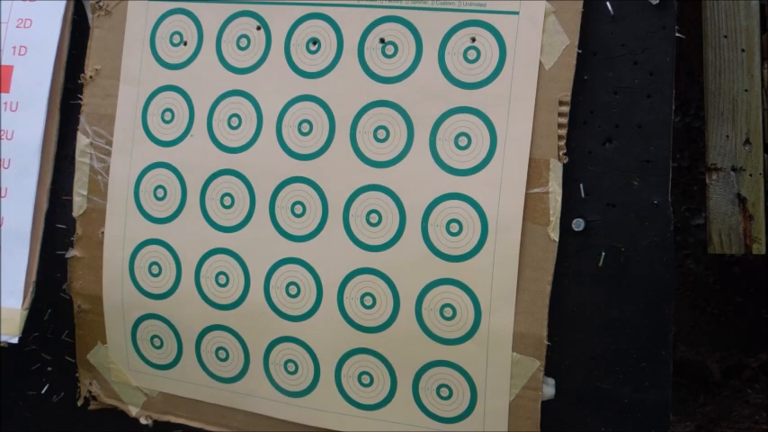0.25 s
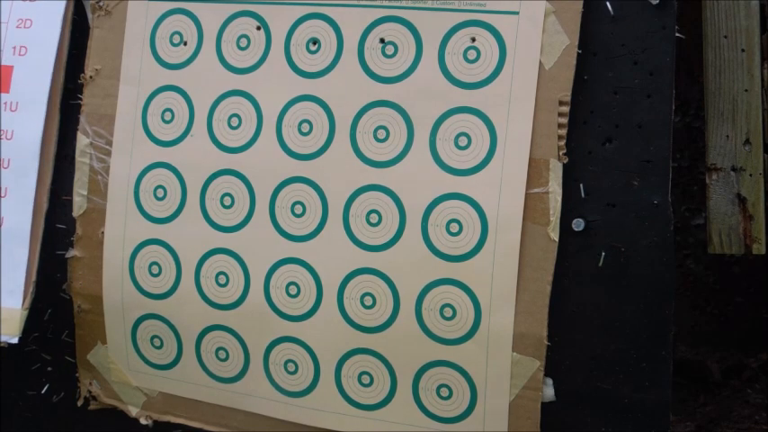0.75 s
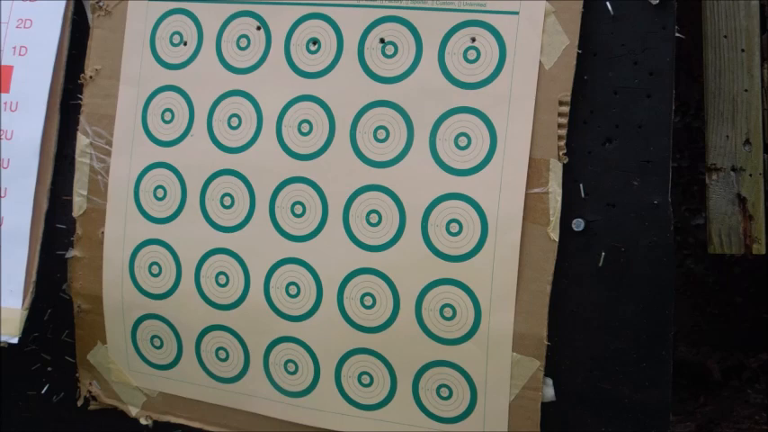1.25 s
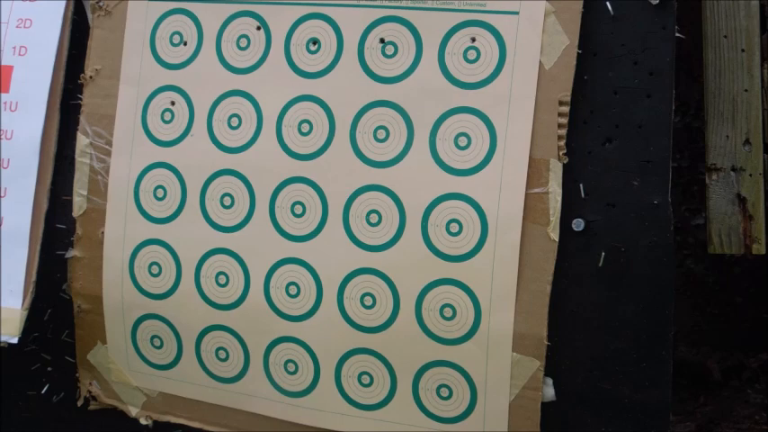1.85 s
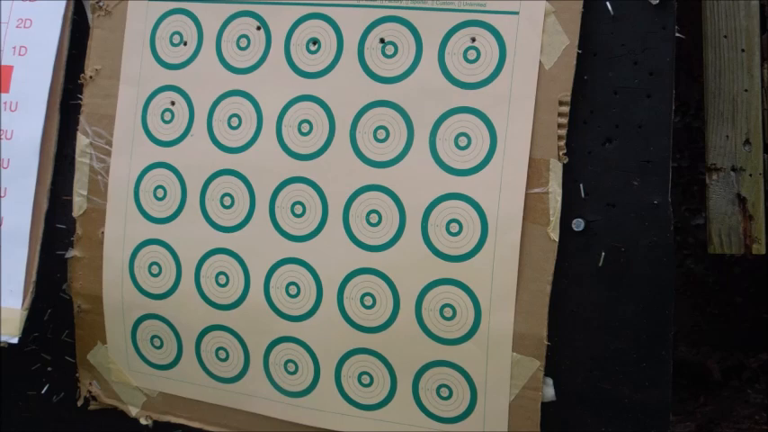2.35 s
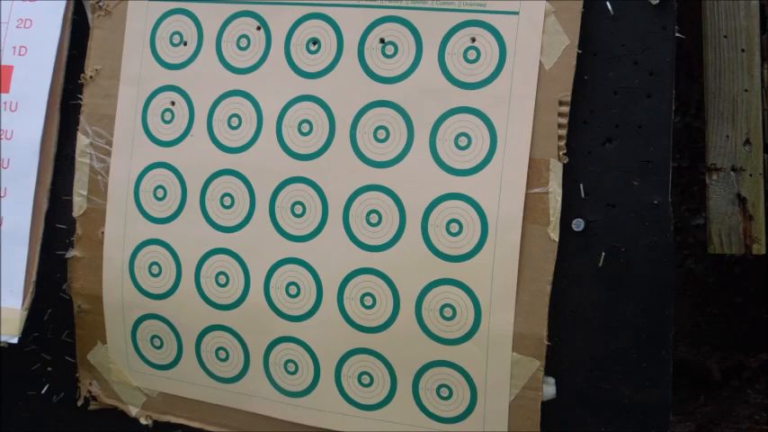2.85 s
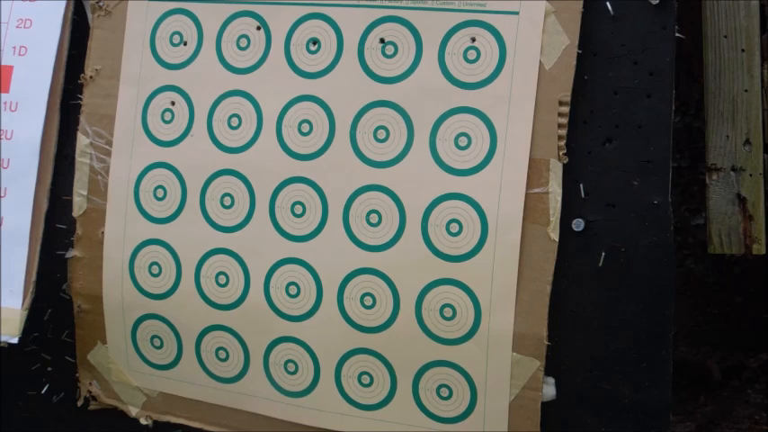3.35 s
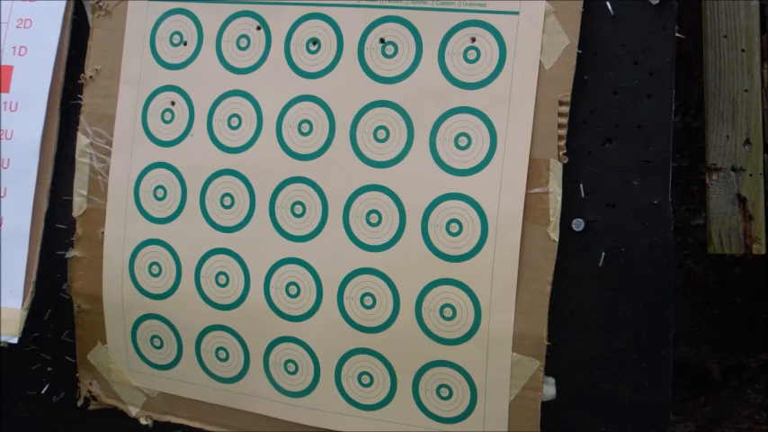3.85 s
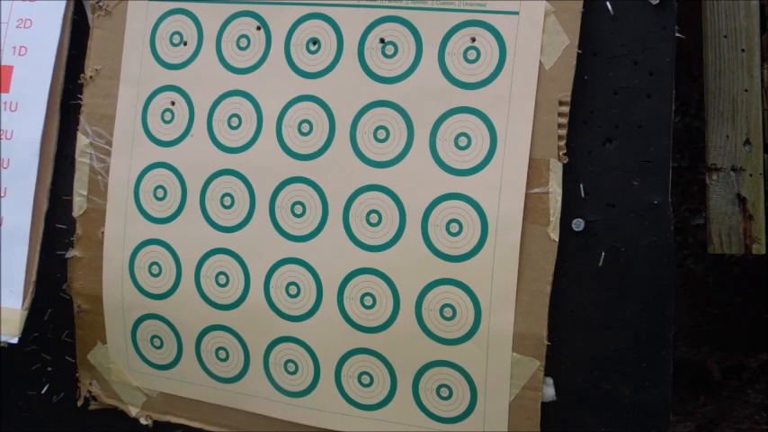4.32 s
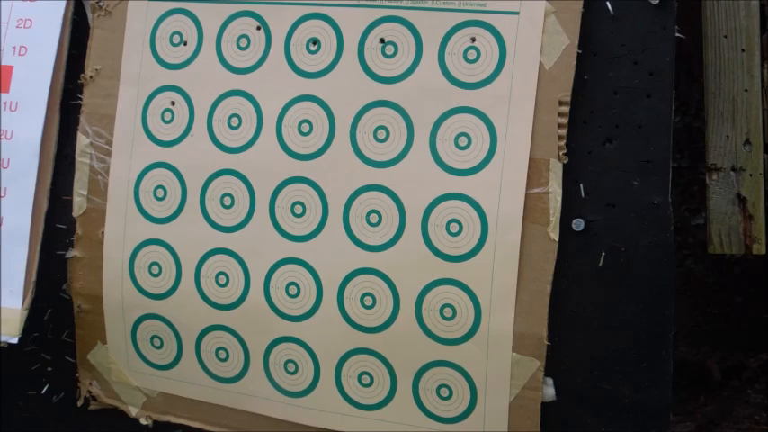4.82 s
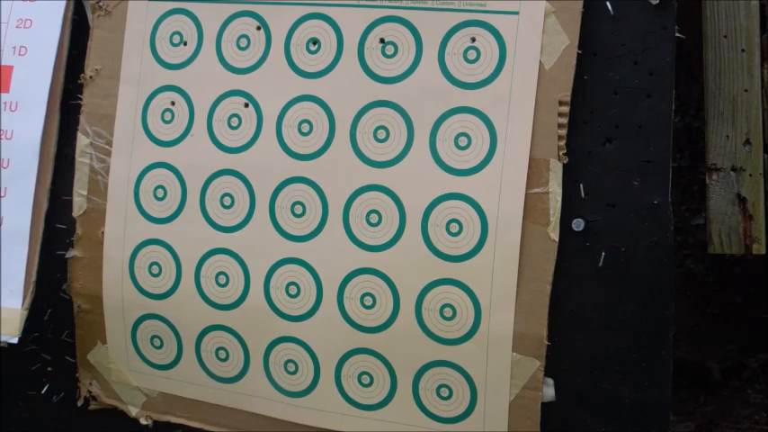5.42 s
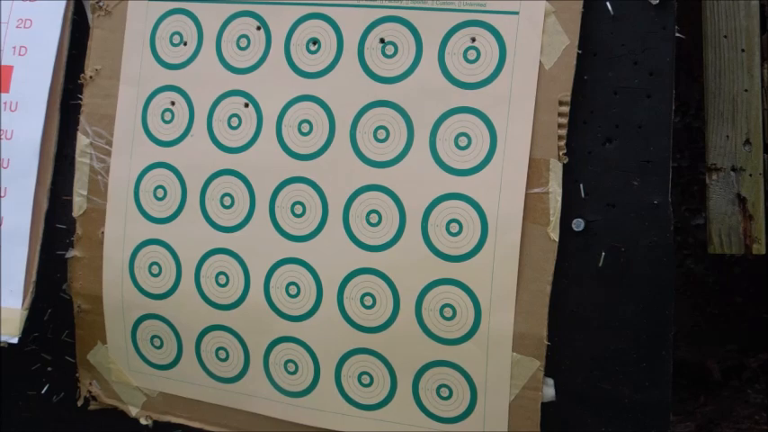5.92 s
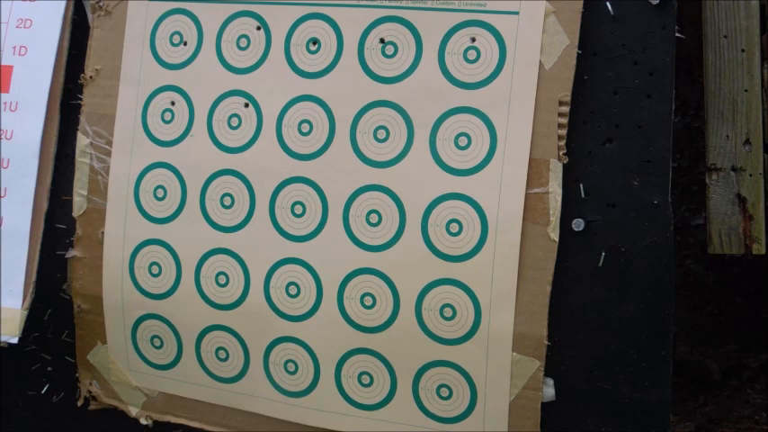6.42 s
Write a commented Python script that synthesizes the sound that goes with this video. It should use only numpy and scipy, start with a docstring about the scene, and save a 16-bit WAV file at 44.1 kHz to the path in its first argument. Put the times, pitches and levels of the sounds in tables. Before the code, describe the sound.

Two bullets crack and slap into a paper target at close range, each followed by a distant report echoing through woods full of trilling insects.

```python
"""Two small-calibre rifle shots, heard from beside the paper target in a wood full of trilling insects.
Each bullet's crack and strike, shaped noise bursts, overload the microphone; the distant report follows as
single pressure cycles and as noise decaying faster in the treble, the echo of the trees. Insects are gliding
and pulsing tones over band noise; ticks, draught and gusts are coloured noise; eddies are brief low tones.
The sound cuts out four times and swells back; as the second gap ends the right channel crackles."""
import sys
import numpy as np
from scipy import signal
from scipy.fft import rfft, irfft, next_fast_len
from scipy.io import wavfile
from scipy.ndimage import map_coordinates

SR = 44100
rng = np.random.default_rng(int(sys.argv[2]) if len(sys.argv) > 2 else 0)


def master(y):
    """Save y as 16-bit WAV."""
    cut = np.clip(np.atleast_2d(y).T, -1, 1)
    pcm = np.round(cut * 32767)  # scale
    wavfile.write(sys.argv[1], SR, pcm.astype(np.int16))


N = 294579
TIME = np.arange(N) / SR  # s

# All levels below are relative, ahead of the mix and the clipping input. Level of the insects over time. Each
# row: time in seconds, nearest insect in dB, chorus in dB.
INSECT_LEVEL = [(0, -40, -44.5), (.7, -41.5, -44), (1.4, -38, -42.5), (1.9, -47, -49.5), (2.1, -43.5, -50),
                (2.4, -37, -42), (2.7, -30, -41), (3.8, -32.5, -44), (4.3, -34.5, -44), (5.0, -33, -41.5),
                (5.4, -43, -59), (5.9, -31.5, -44), (6.68, -34, -43)]
# Singers that stand out of the chorus. Each row: pitch in Hz, pulses per second, level in dB.
FAR_SINGERS = [(8240, 29.2, -5.5), (7760, 19.2, -5.5)]
# Nearly even pace of the nearest insect. Each row: from this time in seconds, chirps per second.
CHIRP_PACE = [(0, 13.658), (2.35, 13.17), (3.4, 13.921), (4.6, 12.982), (4.85, 13.683), (6.1, 13.565)]
FIRST_CHIRP_S, CHIRP_JITTER_S = .756, .001
# Slow draught under the gusts. Each row: time in seconds, level of the deep bass in dB.
DRAUGHT_LEVEL = [(0, -35), (.45, -34.5), (.9, -52), (2.35, -49), (2.6, -35), (3.5, -36), (3.85, -43),
                 (4.9, -38), (5.75, -43), (6.5, -39)]
# Gusts that buffet the microphone. Each row: start in seconds, hold in seconds, level in dB before it sags.
WIND_GUSTS = [(0, .22, -40), (.37, .14, -44.5), (2.6, .28, -26), (2.99, .22, -32.5), (3.31, .14, -32.5),
              (3.53, .12, -40.5), (4.43, .1, -35), (4.69, .18, -29), (5.42, .18, -43), (6.04, .05, -40),
              (6.38, .18, -39.5)]
GUST_RISE_S, GUST_SAG_DB_PER_S, GUST_T60_S = .025, 12, .27
CALM_DB = -57  # rumble between gusts
# Small dry ticks in the litter. Each row: start in seconds, level in dB, 60 dB decay time in seconds.
LITTER_TICKS = [(0.096, -43, 0.036), (0.156, -50, .03), (0.373, -43.5, .025), (0.449, -30.5, .05),
                (6.32, -40, .04)]
# Soft bumps of the air. Each row: centre in seconds, level in dB, frequency in Hz, width in seconds.
AIR_BUMPS = [(.212, -45, 162, .014), (2.63, -24.5, 200, 0.008), (2.81, -31.5, 135, 0.023),
             (2.866, -25.5, 125, 0.016), (3.181, -33.5, 163, 0.017), (3.45, -24, 89.5, 0.016),
             (4.528, -31.5, 191, 0.0067), (4.709, -29, 160, 0.004), (6.086, -30, 200, 0.0075),
             (6.452, -34, 218, 0.01)]
# Silences. Each row: start in seconds, end in seconds, recovery time constant in seconds.
SILENCES = [(0.69, 0.748, 0.37), (2.426, 2.477, 0.42), (3.897, 3.941, 0.58), (6.568, 6.626, 0.66)]
# Bullets arriving. Each row: time in seconds, crack in dB, strike in dB, backboard thud in dB,
# delay of the overload swing in seconds, forest echo in dB.
BULLETS = [(1.4601, 7, 7.5, -5.5, .0205, -27), (5.078, 1.5, 4, -10.5, .0185, -27.5)]
# Dense stands of trees that swell the echo. Each row: seconds after the report, change in dB, width in seconds.
TREE_STANDS = [(0.09, 3.5, 0.0083), (.17, -2, 0.043), (.275, 1.5, 0.024), (.39, 0, 0.066)]
# The report and its echoes off single trunks, alike for every shot.
# Each row: seconds after the bullet, level in dB, centre frequency in Hz.
REPORT_SLAPS = [(.209, -14, 6300), (.2174, -9, 9000), (.2192, -9, 9400), (.2234, -8.5, 9400),
                (.2275, -21, 7000), (.2335, -22, 6000), (.2943, -16, 2500), (.433, -27, 2300),
                (.488, -23, 2200)]
# Electrical crackle. Each row: peak in seconds, drive in dB, rise and decay constant in seconds.
CRACKLE_SPIKES = [(2.4826, -0.5, 0.00084), (2.4857, 3, 0.001), (2.488, -11, 0.0016), (2.4904, 11, 0.00044),
                  (2.4949, -6.5, 0.00026)]

# Spectral shapes. Each row: frequency in Hz, relative density in dB per Hz.
CHORUS_SPECTRUM = [(4000, -74), (6100, -25.5), (6700, -7.5), (7200, -2.5), (7750, -3), (8100, -5.5),
                   (8600, -16.5), (10000, -41.5)]
HISS_SPECTRUM = [(30, 6), (200, 8), (330, 7.5), (390, 10.5), (470, 5.5), (900, 5), (2000, 1), (5500, -1.5),
                 (9000, -2.5), (11000, -5), (13000, -6.5), (14100, -2)]
DRAUGHT_SPECTRUM = [(10, -4), (25, 3), (55, 3), (80, -7.5), (160, -39)]
GUST_SPECTRUM = [(40, -27), (85, 3), (150, -1), (220, -9.5), (330, -20), (900, -53)]
CRACK_SPECTRUM = [(40, -10.5), (250, -3.5), (900, -8), (1800, -2), (3100, 2.5), (4400, -9.5), (8000, -9.5),
                  (14000, -15)]
STRIKE_SPECTRUM = [(40, -2), (200, -6), (700, 0.5), (2000, 2.5), (4500, 2.5), (7000, 2.5), (11000, 8),
                   (14000, 5)]
BOARD_SPECTRUM = [(60, -10), (160, 0.5), (260, -3), (480, -7.5), (900, -25)]
GROVE_SPECTRUM = [(100, -14.5), (600, -16.5), (1400, -3), (2900, 5), (4200, -4), (6000, -2.5), (9000, -5),
                  (12000, -2.5), (14000, -12.5)]
FOREST_SPECTRUM = [(100, -15), (550, -23), (1100, -3), (1800, 4), (3000, 6), (4000, -3), (5500, -0.5),
                   (8000, -1.5), (12000, 2.5), (14000, -13.5)]
# Reverberation of the forest. Each row: frequency in Hz, 60 dB decay time in seconds.
FOREST_DECAY = [(200, 6), (1500, 3.47), (3000, 2.07), (4200, 1.52), (6000, 1.1), (9000, 0.48), (13000, 0.4)]
# Response of the microphone. Each row: frequency in Hz, gain in dB.
MICROPHONE_RESPONSE = [(20, 0), (13500, 0), (14200, -1), (14600, -13), (16000, -17)]
# How unlike the two ports hear each kind of sound, by name.
# Each row: frequency in Hz, side level against mid in dB.
SIDE_LEVEL = {"shock": [(300, -12.5), (2500, -15), (11000, -3)], "grit": [(500, -10.5), (5000, -6.5),
              (12000, 0)], "grove": [(200, -5.5), (2000, -33), (5000, -32), (11000, -4.5)],
              "echo": [(200, -25), (2000, -14.5), (5000, -7.5), (11000, -4.5)], "around": [(200, -5.5),
              (1500, -4.5), (5000, -4), (11000, -1.5)], "wind": [(40, -1.5), (200, -2.5)]}


def amp(db):
    """Decibel law: 20 dB is a tenfold gain."""
    return 10 ** (np.asarray(db) / 20)


def unit(x):
    """Normalization: scale to rms 1."""
    return x / np.sqrt(np.mean(x ** 2) + 1e-20)


def along(points, hz):
    """Logarithmic interpolation: read (Hz, value) points on a log frequency axis."""
    f, v = np.transpose(points)
    return np.interp(np.log(hz + 1), np.log(f + 1), v)


def curves(rows):
    """Linear interpolation: one value per sample for each column after the time."""
    s, *columns = np.transpose(rows)
    return [np.interp(TIME, s, column) for column in columns]


def wobble(rate):
    """Random modulation: a smooth curve through random knots, rate knots a second."""
    knots = rng.standard_normal(int(N * rate / SR) + 4)
    return map_coordinates(knots, [TIME * rate])


def filtered(x, response):
    """Linear filtering: multiply the spectrum of x by a response of frequency."""
    n = x.shape[-1]
    m = next_fast_len(n + 8192)
    return irfft(rfft(x, m) * response(np.fft.rfftfreq(m, 1 / SR)), m)[..., :n]


def noise(spectrum, wide, size=N, spiky_db=0):
    """Partial coherence: mid and side noise of rms 1; if spiky, a crowd of clicks of very unequal size."""
    white = rng.standard_normal((2, size)) * amp(spiky_db * rng.standard_normal(size))

    def mid_side_gain(hz):
        mid_db = along(spectrum, hz)
        return amp(np.array([mid_db, mid_db + along(SIDE_LEVEL[wide], hz)]))

    mid, side = filtered(white, mid_side_gain)
    return unit(np.array([mid + side, mid - side]))


def pan(db):
    """Level difference between ears: left and right gains, positive towards the left."""
    return amp([[db / 2], [-db / 2]])


def add(track, s, sound):
    """Superposition: mix a sound into the track at time s."""
    part = track[..., round(s * SR):][..., :sound.shape[-1]]
    part += sound[..., :part.shape[-1]]


def swell(t, start, rise, hold, t60):
    """Exponential decay: an envelope that rises, holds, then falls 60 dB in each t60."""
    decay_age = np.maximum(t - start - rise - hold, 0)
    return np.clip((t - start) / rise, 0, 1) * amp(-60 * decay_age / t60)


def insects():
    """Amplitude modulation: the nearest insect chirps over pulsing neighbours and a far chorus."""
    near_db, chorus_db = curves(INSECT_LEVEL)
    far = noise(CHORUS_SPECTRUM, "around") * amp(-2 + 2.3 * wobble(40))
    port_phase = np.array([[0], [1.3]])  # rad, left and right
    for hz, rate, db in FAR_SINGERS:
        pulses = np.maximum(np.sin(2 * np.pi * rate * TIME + .6 * wobble(3)), 0) ** 2
        cycles = np.cumsum(hz + 70 * wobble(600)) / SR
        tone = np.sin(2 * np.pi * cycles + port_phase)
        far += amp(db - 2.5) * unit(pulses * tone * amp(3.6 * wobble(14)))
    near = 1.58 * amp(near_db) * chirps() * pan(-2.2)
    return near + far * amp(chorus_db) * pan(-2)


def air():
    """Turbulence: an even hiss, a deep draught, and lumpy gusts that rise fast, sag and die away."""
    hiss = amp(-46.5) * noise(HISS_SPECTRUM, "around")
    draught_db, = curves(DRAUGHT_LEVEL)
    draught = amp(draught_db) * noise(DRAUGHT_SPECTRUM, "wind") * pan(4)
    gusts = np.zeros(N)
    for s, hold, db in WIND_GUSTS:
        sagging_db = db - GUST_SAG_DB_PER_S * np.maximum(TIME - s, 0)
        gusts += amp(sagging_db) * swell(TIME, s, GUST_RISE_S, hold, GUST_T60_S)
    lumps = amp(3 * wobble(22))
    rumble = unit(lumps * noise(GUST_SPECTRUM, "wind"))
    return hiss + draught + (amp(CALM_DB) + gusts) * rumble * pan(4.9)


def ticks():
    """Impulsive excitation: faint bright ticks among dry leaves, made of very unequal clicks."""
    envelope = sum(amp(db) * swell(TIME, s, 0.0013, 0.004, t60) for s, db, t60 in LITTER_TICKS)
    spectrum = [(500, -41), (2500, -4), (8000, -10), (10500, 7.5), (14000, -15)]
    return envelope * noise(spectrum, "around", spiky_db=8.5)


def bumps():
    """Pressure of single eddies: each rocks the microphone for a few cycles, mostly on the left."""
    rocking = np.zeros(N)
    for s, db, hz, width in AIR_BUMPS:
        envelope = amp(db) * np.exp(-np.abs(TIME - s) / width)
        rocking += envelope * np.sin(2 * np.pi * hz * (TIME - s))
    return pan(7) * rocking


def presence():
    """Gain control: the level drops to nothing in each gap and then creeps back."""
    gain = np.ones(N)
    for start, end, recovery in SILENCES:
        fade = np.clip((start - TIME) / 0.01, 0, 1)
        age = np.maximum(TIME - end + 0.032, 0)  # the return starts already partly open
        back = (TIME > end) * (1 - np.exp(-(age / recovery) ** 1.5))
        gain *= np.maximum(fade, back)
    return gain


def chirp_times():
    """Quasi-periodicity: one chirp for each beat of the insect's pace, slightly early or late."""
    since, rate = np.transpose(CHIRP_PACE)
    pace = rate[np.searchsorted(since, TIME, "right") - 1]
    beats = np.cumsum(pace) / SR
    first_beat = np.interp(FIRST_CHIRP_S, TIME, beats)
    times = np.interp(np.arange(first_beat, beats[-1]), beats, TIME)
    return times + CHIRP_JITTER_S * rng.standard_normal(len(times))


def chirps():
    """Stridulation: each wing stroke sags in pitch as it slows; it reaches the two ports out of step."""
    out, t = np.zeros((2, N)), np.arange(SR // 30) / SR
    times = chirp_times()
    port_phase = np.array([[0], [1.1]])  # rad, left and right
    for s, (length, pitch, loud, slip) in zip(times, rng.standard_normal((len(times), 4))):
        stroke = np.clip(t / (.022 * amp(.5 * length)), 0, 1)  # progress from 0 to 1
        hz = 7540 + 40 * pitch + 330 * stroke - 950 * stroke ** 4
        pressure = np.abs(np.sin(np.pi * stroke)) ** .4
        # now and then the scraper skips
        grip = 1 - (slip > .9) * np.exp(-((stroke - .75) / .09) ** 2)
        tone = np.sin(2 * np.pi * np.cumsum(hz) / SR + port_phase)
        add(out, s - .0108, amp(loud * .8) * pressure * grip * tone)
    return out * amp(1.2 * wobble(500))


def overload(t, delay):
    """Overdrive recovery: the input swings to its lower rail, rebounds and settles; the left hangs longer."""
    def dip(centre, width):
        return np.exp(-((t - centre) / width) ** 2)

    rail = np.array([dip(delay + 0.0013, .0036), dip(delay - .0008, .0018)])
    u = np.maximum(t - delay, 0)
    rebound = (1 - np.exp(-(u / 0.036) ** 2)) * (np.exp(-u / 0.066) - 0.32 * np.exp(-u / 0.16))
    return -2.2 * rail + np.array([[.72], [.36]]) * rebound


def bullets():
    """Shock and impact: crack and ground bounce, then thumped board, sprayed grit and answering near trees."""
    out, t = np.zeros((2, N)), np.arange(SR) / SR
    for s, crack_db, strike_db, thud_db, delay, _ in BULLETS:
        direct = swell(t, 0, .0001, 0.0024, 0.0098)
        ground_bounce = 0.59 * swell(t, .0046, 0.00062, 0.0023, .011)
        crack = amp(crack_db) * (direct + ground_bounce) * noise(CRACK_SPECTRUM, "shock", size=SR)
        grit = noise(STRIKE_SPECTRUM, "grit", size=SR, spiky_db=3)
        spray = 1.1 * swell(t, 0.0039, 0.005, 0.0026, 0.089) + 0.5 * swell(t, .018, 0.011, 0.0064, .08)
        strike = amp(strike_db) * spray * grit
        board = swell(t, .001, .003, .014, .05)  # the board stops quickly
        thud = amp(thud_db) * board * noise(BOARD_SPECTRUM, "grit", size=SR)
        trunks = noise(GROVE_SPECTRUM, "grove", size=SR, spiky_db=4)
        grove = amp(-19) * swell(t, 0.063, 0.031, 0.016, 0.23) * trunks
        add(out, s, crack + strike + thud + grove + overload(t, delay))
    return out


def forest():
    """Multiple scattering: the slower report returns off countless trunks; air swallows its treble first."""
    size = 2 * SR
    out, t = np.zeros((2, N)), np.arange(size) / SR
    stands_db = sum(db * np.exp(-((t - delay) / width) ** 2) for delay, db, width in TREE_STANDS)

    # trunks return separate slaps, leaves a smooth fizz above them
    def trunk_share(hz):
        return 1 / (1 + (hz / 3800) ** 8)

    for s, *_, db in BULLETS:
        clumping = amp(stands_db + 1.37 * wobble(45.1)[:size])
        trunks = noise(FOREST_SPECTRUM, "echo", size=size, spiky_db=5) * clumping
        leaves = amp(1.0) * noise(FOREST_SPECTRUM, "echo", size=size)
        returns = filtered(trunks, trunk_share) + filtered(leaves, lambda hz: 1 - trunk_share(hz))
        hz, age, bands = signal.stft(returns, SR, nperseg=256)
        decay = amp(-60 * age / along(FOREST_DECAY, hz)[:, None])
        tail = signal.istft(bands * decay, SR, nperseg=256)[1][:, :size]
        add(out, s + .205, amp(db) * np.minimum(t / 0.038, 1) * tail)
    return out


def slaps():
    """Discrete reflection: each distinct arrival is one pressure cycle with a short scatter behind it."""
    out, t = np.zeros((2, N)), np.arange(2048) / SR
    for s, *_ in BULLETS:
        for delay, db, hz in REPORT_SLAPS:
            phase = np.pi * hz * (t - .0005)  # the cycle is centred 0.5 ms in
            cycle = -1.8 * phase * np.exp(-phase ** 2)
            spectrum = [(hz / 5, -22), (hz, 0), (hz * 1.5, 0), (hz * 1.9, -28)]
            scatter = noise(spectrum, "echo", size=len(t))
            trail = 0.36 * swell(t, 0.00023, 0.00018, 0.00038, 0.012) * scatter
            add(out, s + delay - .0005, amp(db) * (cycle + trail))
    return out


def crackle():
    """Saturated electrical impulses: a quick run of shrill ringing spikes in the right channel alone."""
    envelope = sum(amp(db) * np.exp(-np.abs(TIME - s) / decay) for s, db, decay in CRACKLE_SPIKES)
    ring = np.sin(2 * np.pi * 7800 * TIME)
    spectrum = [(300, -7), (3300, -34.5), (7000, 4.5), (12000, -2.5), (14500, 3), (15800, 0.5)]
    fizz = noise(spectrum, "shock")[0]
    return np.array([[0], [1]]) * np.tanh(envelope * (.45 * ring + 0.71 * fizz))


def scene():
    """Superposition: every outdoor source, interrupted by the gaps, with the bumps of air on top."""
    outdoors = insects() + air() + ticks() + bullets() + forest() + slaps()
    outdoors = filtered(outdoors, lambda hz: 1 / (1 + (hz / 14300) ** 120))
    return presence() * outdoors + bumps()


def record(dry):
    """Saturation and band limiting: the input clips and loses its top treble; the crackle enters behind it."""
    clipped = dry / (1 + np.abs(dry) ** 6) ** (1 / 6)
    coloured = filtered(clipped, lambda hz: amp(along(MICROPHONE_RESPONSE, hz)))
    top_hz = 16000
    return filtered(amp(-0.44) * coloured + crackle(), lambda hz: 1 / (1 + (hz / top_hz) ** 150))


dry = scene()
out = record(dry)
master(out)
```